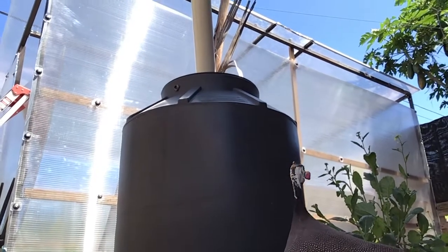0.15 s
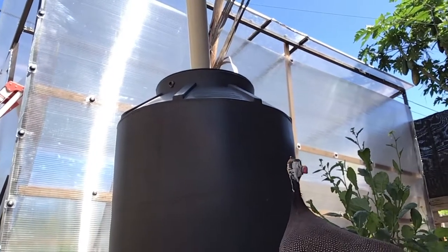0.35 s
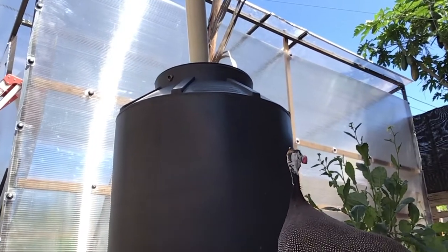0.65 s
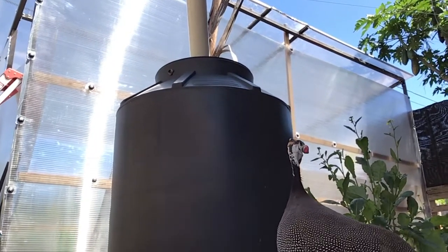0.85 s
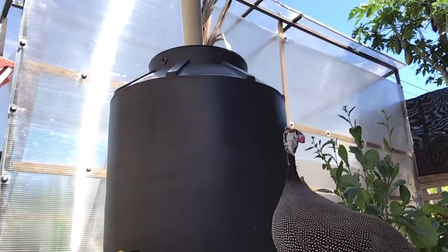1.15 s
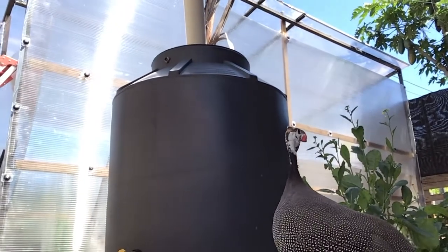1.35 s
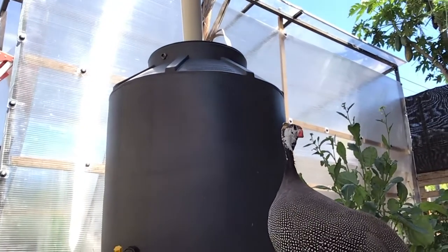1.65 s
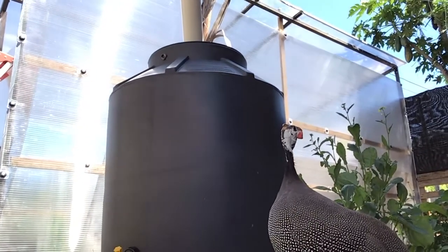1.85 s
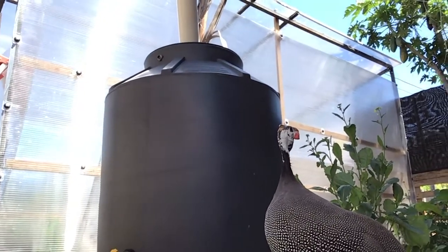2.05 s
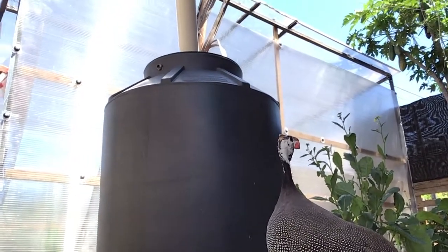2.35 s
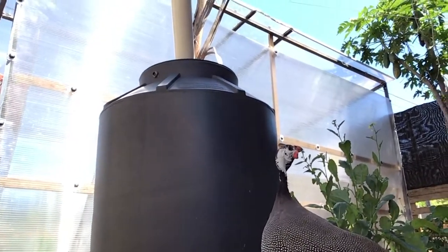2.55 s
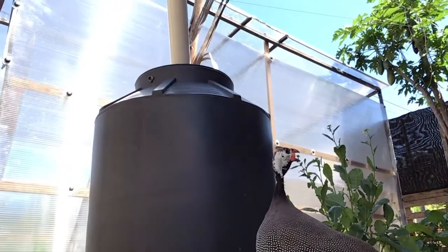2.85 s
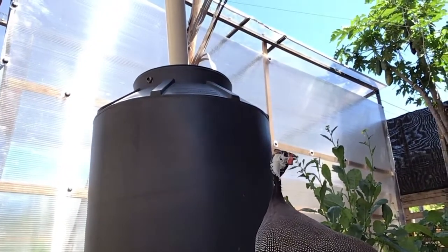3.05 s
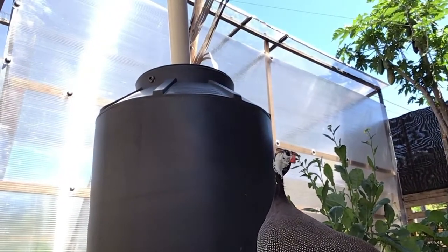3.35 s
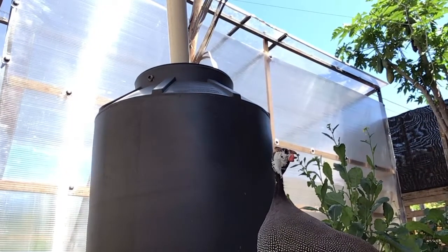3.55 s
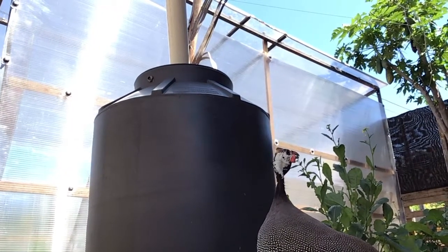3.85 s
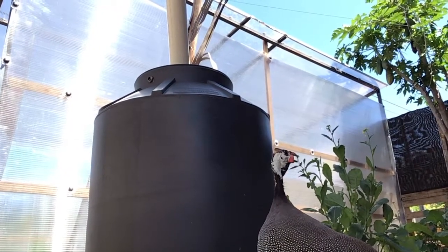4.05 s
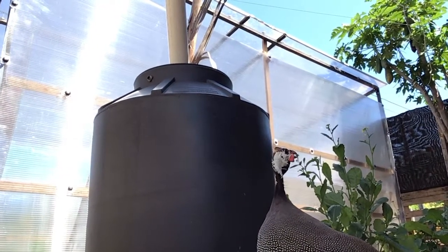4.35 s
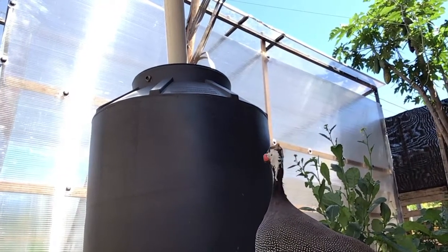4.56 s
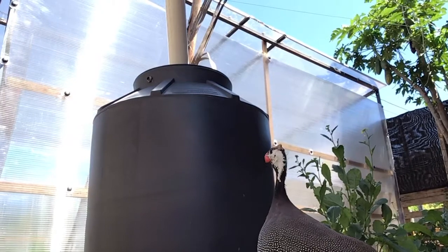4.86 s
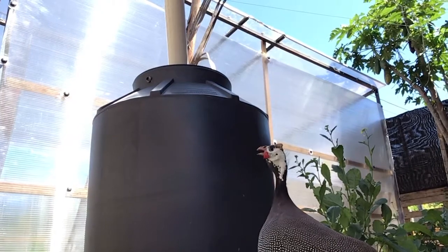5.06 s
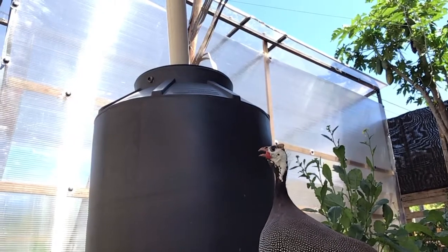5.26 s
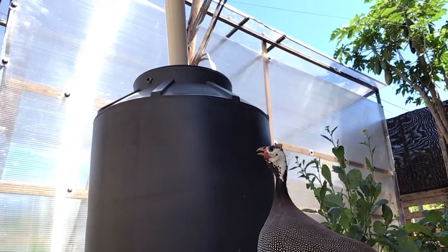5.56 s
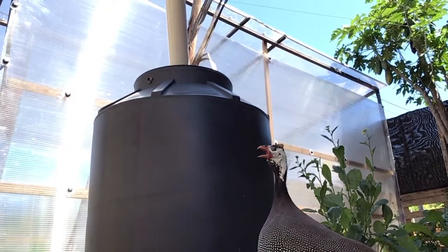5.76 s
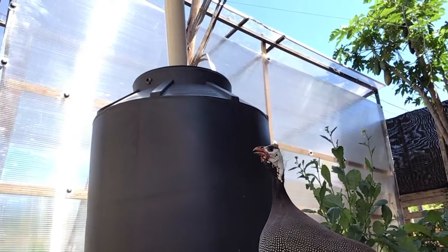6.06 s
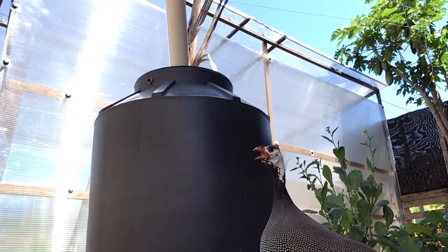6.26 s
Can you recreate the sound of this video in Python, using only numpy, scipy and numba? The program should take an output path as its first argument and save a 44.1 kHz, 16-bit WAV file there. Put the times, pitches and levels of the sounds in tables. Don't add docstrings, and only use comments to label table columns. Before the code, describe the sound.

In an open garden, a near guineafowl repeats a harsh two-part call about every 0.6 seconds. The first short chip comes at 0.24 s and its long syllable at 0.37 s; further pairs start near 0.84, 1.47, 2.1, 2.7, 3.3, 3.85, 4.4, 5.0, 5.55 and 6.12 s. Each chip is a tiny tone near 1.85 kHz; the long note is a sharp whistle around 1.9 kHz cracking into a nasal, rattling buzz, about 0.1 s in all, sometimes edged by tiny squeaks. Between them, distant mates give nasal notes, high chirps, clucks and swelling rasps. A thin small-bird whistle falls at 0.5-0.8 s. Wind rumble and soft microphone knocks mark the first 2.5 s, over a faint motor hum, then calm. Faint twig ticks occur at 0.16, 3.67 and 4.3 s. After 4.6 s the rasp brightens, and the last two chips are loudest. Tank and walls return quick echoes.

```python
import sys
import numpy as np
from scipy import signal
from scipy.fft import rfft, irfft
from scipy.io import wavfile
from scipy.ndimage import uniform_filter1d
from numba import njit

SR = 44100
rng = np.random.default_rng(int(sys.argv[2]) if len(sys.argv) > 2 else 0)


def to_linear_factor(level_db):
    exponent = np.asarray(level_db, float) / 20
    return 10 ** exponent


def transcribe(u):
    v = np.clip(np.atleast_2d(u).T, -1, 1)
    q = np.round(v * 32767).astype(np.int16)
    wavfile.write(sys.argv[1], SR, q)


N = 283122
SILENT_DB = -110

# (frequency [Hz], level [dB per Hz])
WIND_SPECTRUM = [(18, -43.5), (30, -12), (59, 4), (145, -1.5), (360, -26), (455, -35), (500, -46),
                 (1100, -120)]
# (peak time [s], level [dB])
GUSTS = [(0.06, -52.5), (0.6, -49.5), (0.841, -54.5), (1.28, -50), (1.502, -55.5), (2.019, -56.5),
         (2.53, -56), (3.15, -66), (3.279, -71), (3.46, -71), (3.701, -68), (3.849, -63), (4.2, -62.5),
         (4.92, -65), (5.5, -64), (6.06, -61.5)]
CALM_DB, CALMING_DB_PER_S = -62.5, 0.5
GUST_RISE_DB_PER_S, GUST_FALL_DB_PER_S = 100, 128
# (time [s], peak [dB])
THUMPS = [(0.046, -40), (0.556, -32), (0.605, -41.5), (0.788, -37.5), (0.838, -36.5), (1.161, -42.5),
          (1.264, -39.5), (1.329, -39), (1.476, -35), (1.538, -37.5), (2.027, -47), (2.488, -51),
          (2.549, -50), (3.689, -44.5), (3.789, -63)]
THUMP_HZ, THUMP_WIDTH_HZ, THUMP_S, THUMP_LAG_S = 125.4, 74, 0.0047, .009
# (time [s], level [dB])
MOTOR_LEVEL = [(0.0, -61), (.1, -60), (.25, -50), (.45, -67), (2.09, -57), (2.61, -77), (6.42, -74.5)]
# (frequency [Hz], level [dB per Hz])
AIR_SPECTRUM = [(300, 0), (907, -19), (1030, -16), (1260, -11.5), (1970, -6.5), (2210, -15.5), (11900, -29),
                (15500, -41)]
AIR_DB = -66

# (time [s], length [s], pitch [Hz], partial 1 [dB], partial 2 [dB])
MATES = [(0, 0.032, 1087, -64, -51.5), (0.32, 0.018, 1110, -64, -88.5), (0.536, 0.057, 1087, -71, -56),
         (0.865, 0.11, 1038, -72, -76), (1.411, 0.078, 1030, -69, -62), (1.557, 0.15, 1133, -64, -55.5),
         (1.962, 0.072, 1058, -67.5, -72.5), (2.132, 0.09, 1123, -62, -59),
         (2.521, 0.083, 1022, -70.5, -68), (2.722, 0.057, 1135, -65, -60), (3.099, 0.075, 1015, -70, -66),
         (3.255, 0.099, 1115, -74, -55), (3.675, 0.055, 1052, -69, -105), (3.832, 0.17, 1124, -63, -54),
         (4.236, 0.088, 1020, -73, -68.5), (4.375, 0.19, 1109, -61.5, -57),
         (4.787, 0.092, 1014, -71, -67.5), (4.943, 0.092, 1135, -66.5, -62),
         (5.364, 0.066, 1029, -74.5, -62), (5.498, 0.082, 1133, -74, -55), (6.016, 0.15, 1133, -63, -55)]
MATE_BRIGHT_DB = [-8, -7, 5.5, 0, 1, -0.5, -8, 0, -1, 2, 3.5, 1, -3, -1, 3.5, -2, -3, 7, 0.5, -13, -5]
MATE_UPPER_DB = [-22, -15.5, -13.5]
MATE_THIRD_DB = -6
MATE_SCOOP, MATE_SCOOP_S = .03, .025
# (time [s], length [s], start level [dB], brightness [dB])
FADES = [(0, 0.082, -49, -7), (0.503, 0.2, -51.5, -6), (0.831, 0.2, -56, -11.5), (1.981, 0.052, -58, -6),
         (2.526, 0.129, -60, -4), (3.697, 0.097, -60.5, -44), (4.798, 0.1245, -66.5, -18),
         (5.361, 0.12, -66, -40), (5.903, 0.22, -59, -25), (6.121, 0.062, -47, -25.5)]
FADE_DB_PER_S = 129
# (time [s], length [s], end level [dB])
SWELLS = [(0.215, 0.16, -57), (1.427, 0.32, -60), (2.087, 0.26, -50.5), (2.653, 0.19, -47.5),
          (3.247, 0.16, -50), (3.814, 0.15, -52.5), (4.355, 0.16, -52), (4.914, 0.17, -48.5),
          (5.475, 0.18, -50.5), (6.018, 0.028, -40)]
SWELL_RISE_DB, SWELL_BRIGHT_DB = 5.5, -8
# (frequency [Hz], width [Hz], gain [dB])
FAR_MODES = [(1260, 58, -14), (1435, 62, 1), (1450, 227, -2.5), (1900, 300, -14), (2300, 110, -23),
             (2715, 330, -3.5)]
FLOCK_PATCHY_DB = 2.5
# (time [s], peak [dB], pitch [Hz])
FAR_CHIRPS = [(0.21, -63, 3480), (0.808, -60, 3490), (1.4274, -62, 3360), (2.0562, -58.5, 3390),
              (2.666, -61, 3370), (3.272, -54, 3484), (3.822, -49.5, 3470), (4.3804, -51, 3440),
              (4.9526, -53, 3360), (5.533, -50.5, 3398), (6.09, -48, 3410)]
FAR_GLIDE = [0.23, 0.3, .15, .12, .12, .05, 0.0415, 0.035, -0.018, 0.03, 0.041]
# (time [s], peak [dB], pitch [Hz])
FAR_CLUCKS = [(1.5417, -45, 1640), (1.9681, -49.5, 1791), (2.6559, -43.5, 1642), (2.7774, -50, 1814),
              (3.2342, -47.5, 1715), (3.8181, -41.5, 1900), (4.795, -53, 1725), (4.9227, -42.5, 1620),
              (5.4846, -47, 1829), (6.0146, -51, 1733)]
# (time [s], pitch [Hz], level [dB])
FALLING_WHISTLE = [(0.51, 4300, -58), (0.6, 4140, -62.5), (0.69, 3920, -61), (0.76, 3400, -69),
                   (0.81, 3060, -68.5)]
# (time [s], pitch [Hz], level [dB])
LOW_PIPING = [(0.715, 1440, -79), (0.736, 1425, -66), (0.83, 1310, -73.5)]
# (time [s], pitch [Hz], level [dB])
PEEP = [(0.6, 2720, -65), (0.64, 2610, -67), (0.685, 2680, -72.5)]
# (time [s], peak [dB])
TICKS = [
    (0.159, -69),
    (3.667, -63),
    (4.32, -59),
]

# (time [s], peak [dB], pitch [Hz], length [s])
SHORT_CALLS = [(0.244, -36.5, 1886, 0.028), (0.841, -30.5, 1818, 0.021), (1.466, -28, 1828, 0.021),
               (2.0974, -31, 1865, 0.0187), (2.703, -33, 1869, 0.016), (3.302, -28.5, 1862, 0.018),
               (3.8509, -26.5, 1881, 0.018), (4.399, -25.5, 1860, 0.024), (4.985, -27, 1822, 0.023),
               (5.5567, -19.5, 1840, 0.027), (6.12, -17.5, 1844, 0.023)]
# (rasp [dB], mouth resonance [dB], beak pitch [Hz])
SHORT_COLOUR = [(7, 0, 5640), (-0.5, 12, 5830), (-4.5, -2, 3700), (-1, 8.5, 5510), (3, 0, 5550),
                (0.5, 8, 5600), (-1.5, -8, 5500), (-5, -6.5, 5800), (8, 11, 5000), (3.5, 6.5, 5330),
                (1, 15, 5430)]
SHORT_OVERTONE_DB = [8.5, 5, 6.5, 5, 1, 5, 6.5, 11, 5, 3, 8]
SHORT_SAG = [.6, 1.1, 1.1, .6, .4, 1.2, .6, 1.1, 0.27, .6, 0.54]
# (time [lengths], level [dB], pitch above the middle [Hz], rasp [dB])
SHORT_SHAPE = [(-.7, -29, 80, -31.5), (-0.3, -19, 64.5, -19), (.1, -6, 31.5, -13), (0.22, -2, 4, -9.5),
               (.6, -1, -13.5, -6), (.8, -9.5, -17.5, -7.5), (0.97, -33, -18.5, -15)]
SHORT_RASP_DB, SHORT_LOW_DB = -19.5, -27.5
SHORT_RASP_TAIL_S, SHORT_LOOSENESS = .03, .4

# (time [s], whistle length [s], length [s], whistle [dB], buzz [dB])
LONG_CALLS = [(0.373, 0.025, 0.12, -25, -25.5), (0.995, 0.015, 0.087, -16.5, -26.5),
              (1.629, 0.025, 0.079, -17.5, -26), (2.236, 0.02, 0.1, -17, -25.5),
              (2.836, 0.029, 0.1, -17.5, -30.5), (3.425, 0.024, 0.11, -19.5, -27.5),
              (3.964, 0.028, 0.11, -19, -27), (4.524, 0.046, .121, -22.5, -26.5),
              (5.117, 0.015, 0.11, -17, -26.5), (5.698, 0.023, 0.11, -15, -26.5),
              (6.233, 0.026, 0.12, -19, -25.5)]
# (whistle pitch [Hz], whistle gain [dB], broken whistle halfway [dB],
#                  at full buzz [dB], buzz halfway [dB])
LONG_COURSE = [(1899, 1.5, -8.5, 2.5, 5), (1901, -3.5, -7, 3.5, 4.5), (1896, -2.5, -4, 0, -2),
               (1890.5, -3.5, 0, -1, -5), (1882, -2.5, -2.5, .5, -1), (1875, 2, -2.5, -1.5, -2.5),
               (1867, -3.5, 1.5, -1.5, -0.5), (1855, 1.5, -2.5, 2, .5), (1867, 1, -7, 2, 5.5),
               (1857, -2.5, -2.5, .5, 1), (1856, -0.5, -1, 3, 0)]
# (beak pitch at whistle [Hz], at end [Hz], rasp under whistle [dB],
#                  rasp in buzz [dB], mouth resonance [dB])
LONG_COLOUR = [(5490, 4620, 1, 0, 5.5), (5510, 4470, 3, -0.5, 6.5), (6000, 4200, 1.5, -2, 8),
               (5910, 4400, 1, -0.5, 8.5), (5960, 4480, 6.5, 6.5, 3.5), (5490, 4280, 4, 2, 7),
               (6000, 4410, -0.5, 1, 3), (5300, 3860, 4.5, -3, 2), (5390, 3750, 4, 1, 1.5),
               (5133, 3930, 5.5, -0.5, 2.5), (5260, 3900, 4, 1.5, 6)]
# (tuning [Hz], pitch arch [Hz], low voice [dB], buzz fundamental [dB])
LONG_VOICE = [(1900, 27, 0, 1.5), (1900, 52.5, 0, 0), (1900, 54, 1, 0.5), (1900, 58.1, -1.5, -1.5),
              (1900, 55.1, 4, 1.5), (1900, 52.8, 0., 1), (1900, 54.3, -0.5, -2), (1900, 58.2, -1, 2),
              (1900, 54, 1, 1.5), (1900, 49, -1, 0.5), (1900, 35, -4, 0.5)]
# (looseness of broken whistle [0-1], windpipe [dB], overtones [dB])
LONG_MANNER = [(0.87, -0.5, 5), (1, 1, -3), (.9, 3.5, -1), (.9, 1.5, -5), (0.93, 0, 1), (0.99, 3, 0.5),
               (0.93, 3.5, 2.5), (0.79, 0, 2.5), (0.82, -2.5, 5.5), (0.8, 1, 0.5), (0.79, -2, -4)]
LOCK_SHARE = [0.728, 0.658, 0.698, 0.75, 0.777, 0.719, 0.686, 0.678, .43, 0.666, 0.725]
LOCK_SLACK = [.45, 0.6, .6, 0.53, 1.06, 0.67, 0.88, 0.79, 1.1, 1.1, 0.95]
CLOSE_S = [0.073, 0.049, 0.057, 0.072, 0.067, 0.073, 0.059, 0.076, 0.079, 0.071, 0.086]
LEAD_S, SWELL_S, BREAK_S, TAIL_S = .017, 0.00684, 0.0083, 0.021
STAGE_HZ = [1918, 1947.6, 1909, 1913]
STAGE_DRIFT_HZ_PER_S = [-1.5, 6.5, 0, 1.5]
WHISTLE_BEND_HZ = [35, 29.5, -0.5, 9.5]
WHISTLE_DB = [-29, -12.5, 2, 1.5]
BROKEN_DB = [-0.5, -3, -1.5, -28.5]
RASP_DB = [-26, -11.5, -11, -2, -3, 4, 0, -13.5]
LOW_DB = [-30.5, -61.5, -17.5, -6.5, -13.5, -12, -11.5, -25.5]
BUZZ_DB = [-57, -50, -54.5, -36, -33.5, -17.5, -17, -50.5]
CLEAR_SLACK = [0.18, .2, 0.23, 0.39]
ARCH_LOW_DB = 2
WANDER_HZ = 12
ROUNDING_S = 0.0029
OVERTONE_DB = [-42, -31.5, -53, -52, -45]

# (time [s], gain [dB])
FACING = [(0, -10.5), (2.3, -15), (3.5, -14.5), (4.6, -7), (5.1, -6.5), (6.4, -8)]
FRONT_DB, PIPE_LAG = -1.5, 0.44
# (frequency [Hz], width [Hz], gain [dB])
PIPE_MODES = [(1334, 41, 15), (1464, 70, 17.5), (1677, 123, 26.5), (1803, 170, 23), (2321, 86, 11.5),
              (2657, 190, 5), (3487, 81, 7)]
LOCKED_PIPE_DB = -3
# (frequency [Hz], width [Hz], gain [dB])
BEAK_MODES = [(4280, 1260, 2), (4950, 754, 2.5), (5390, 148, 3), (6107, 340, 1)]
BEAK_REACH_HZ, PATCHY_DB = 563, 3
CLOSING_S, BEAK_LEAD_HZ, BEAK_SAG = 0.014, 300, 0.19
# (frequency [Hz], width [Hz], gain [dB])
HEAD_MODES = [(4100, 1800, -28), (7400, 2800, -14), (8230, 370, -4.5), (14300, 2000, -6)]
HEAD_WAKE_DB, PIPE_WAKE_DB = 10, 25
MOUTH_HZ, MOUTH_WIDTH_HZ, MOUTH_FOLLOWS = 11490, 1150, 0.55
PUFF_HZ, PUFF_WIDTH_HZ, PUFF_DB = 1410, 100, 16
RASP_FLOOR_HZ = 1020

# (time [s], length [s], pitch [Hz], level [dB])
SQUEAKS = [(0.226, 0.039, 3940, -71), (0.33, 0.013, 3900, -70), (0.34, 0.034, 4220, -72),
           (0.956, 0.027, 4560, -48.5), (0.974, 0.039, 3950, -46.5), (1.442, 0.031, 3920, -63),
           (1.582, 0.037, 4540, -51.5), (1.6, 0.042, 4014, -45.5), (2.07, 0.038, 3945, -61.5),
           (2.204, 0.048, 3880, -53), (3.942, 0.012, 3955, -57), (4.494, 0.017, 4950, -53),
           (5.088, 0.016, 4400, -49), (5.102, 0.014, 4115, -49), (5.663, 0.025, 4587, -47),
           (5.665, 0.01, 5000, -54), (5.677, 0.015, 4137, -48), (6.2, 0.023, 4594, -57),
           (6.212, 0.021, 3970, -54)]
SQUEAK_SECOND_DB, SQUEAK_THIRD_DB = -16.5, 1
SWEET_HZ, SWEET_WIDTH_HZ = 12310, 330

# (delay [s], level [dB])
ECHOES = [
    (.012, -13.5),
    (.037, -18),
    (.062, -31.5),
    (0.11, -75.5),
]
# (time [s], echo gain [dB])
WALLWARD = [(0, 1.5), (4.6, .5), (5.1, -2), (6.0, -2), (6.42, -2.5)]
YARD_T60_S, YARD_DB, WALL_CUT_HZ = 0.28, -22.5, 10000
MIC_TOP_HZ = 15800


def rms_one(x):
    return x / np.sqrt(np.mean(x ** 2) + 1e-20)


def joined(tables, levels, fade_s=.009):
    rows = []
    for table in tables:
        table = np.array(table, float)
        ends = table[[0, -1]].copy()
        ends[:, 0] += [-fade_s, fade_s]
        ends[:, levels] = SILENT_DB
        rows += [ends[0], *table, ends[1]]
    s, *columns = np.transpose(rows)
    return [np.interp(np.arange(N) / SR, s, c) for c in columns]


def slow(hz):
    r = np.exp(-2 * np.pi * hz / SR)
    noise = rng.standard_normal(N + 9000)
    return rms_one(signal.lfilter([1], [1, -2 * r, r * r], noise)[9000:])


def turns(hz):
    return 2 * np.pi * np.cumsum(hz) / SR


def band(x, low_hz, high_hz):
    return signal.sosfilt(signal.butter(2, [low_hz, high_hz], "band", fs=SR, output="sos"), x)


def coloured(points):
    hz, db = np.transpose(points)
    gain = to_linear_factor(np.interp(np.log(np.fft.rfftfreq(N, 1 / SR) + 1), np.log(hz), db))
    return rms_one(irfft(rfft(rng.standard_normal(N)) * gain, N))


def resonate(x, modes):
    out = 0
    for k, (hz, width_hz, db) in enumerate(modes):
        r = np.exp(-np.pi * width_hz / SR)
        top = [(1 - r * r) / 2, 0, (r * r - 1) / 2]
        bottom = [1, -2 * r * np.cos(2 * np.pi * hz / SR), r * r]
        out = out + (-1) ** k * to_linear_factor(db) * signal.lfilter(top, bottom, x)
    return out


@njit
def moving(x, hz, r, rate):
    y = np.zeros(len(x))
    for i in range(2, len(x)):
        push = (1 - r * r) / 2 * (x[i] - x[i - 2])
        y[i] = push + 2 * r * np.cos(2 * np.pi * hz[i] / rate) * y[i - 1] - r * r * y[i - 2]
    return y


def wind_db():
    t = np.arange(N) / SR
    power = to_linear_factor(CALM_DB - CALMING_DB_PER_S * t)
    for s, db in GUSTS:
        power = power + to_linear_factor(db - np.maximum(GUST_RISE_DB_PER_S * (s - t), GUST_FALL_DB_PER_S * (t - s)))
    return 20 * np.log10(power)


def thumps():
    push = np.zeros(N)
    bump = np.hanning(int(THUMP_S * SR))
    for s, db in THUMPS:
        at = int((s + THUMP_LAG_S) * SR)
        push[at:at + len(bump)] = to_linear_factor(db) * bump
    return resonate(push, [(THUMP_HZ, THUMP_WIDTH_HZ, 7)])


def background():
    wind = to_linear_factor(wind_db() + 4.1 * slow(28)) * coloured(WIND_SPECTRUM)
    motor = to_linear_factor(joined([MOTOR_LEVEL], [])[0] + 2.0 * slow(0.68)) * np.sin(turns(np.full(N, 172.)))
    air = to_linear_factor(AIR_DB + 0.4 * slow(12)) * coloured(AIR_SPECTRUM)
    return wind + thumps() + motor + air


def mates():
    out = np.zeros(N)
    waver = 1 + 0.005 * slow(60)
    flutter = [to_linear_factor(5.0 * slow(27)) for k in range(3)]
    for (s, length_s, hz, first_db, second_db), bright_db in zip(MATES, MATE_BRIGHT_DB):
        u = np.linspace(0, 1, int((length_s + 0.016) * SR))
        span = slice(int(s * SR), int(s * SR) + len(u))
        one, two, three = [f[span] for f in flutter]
        scoop = MATE_SCOOP * np.exp(-u * length_s / MATE_SCOOP_S)
        phase = turns(hz * (1 + 0.31 * length_s * (u - .5) - scoop) * waver[span])
        weak = sum(to_linear_factor(db) * np.sin((k + 4) * phase) for k, db in enumerate(MATE_UPPER_DB))
        upper = np.sin(3 * phase) + 2 * u * one * weak
        third_db = (first_db + second_db) / 2 + MATE_THIRD_DB + bright_db
        note = to_linear_factor(first_db) * one * np.sin(phase) + to_linear_factor(second_db) * two * np.sin(2 * phase)
        note += to_linear_factor(third_db) * three * upper
        out[span] += to_linear_factor(4.5) * np.minimum(1, 9 * u) * np.minimum(1, 4 * (1 - u)) * note
    return out


def beating(high_turn, low_turn, low_share, breath_db):
    flow = np.exp(4.0 * np.cos(high_turn) + 4.5 * low_share * np.cos(low_turn))
    push = np.diff(flow, prepend=1)
    out = push / np.sqrt(uniform_filter1d(push ** 2, size=500))
    out = out + to_linear_factor(breath_db) * rng.standard_normal(N)
    for lag in (23, 37, 59):
        loop = np.r_[1, np.zeros(lag - 1), -.55]
        out = signal.lfilter(loop[::-1], loop, out)
    return out


def patchy(x, modes):
    return rms_one(sum(to_linear_factor(FLOCK_PATCHY_DB * slow(14)) * resonate(x, [mode]) for mode in modes))


def flock_rasps():
    swells = [[(s, db - SWELL_RISE_DB, SWELL_BRIGHT_DB), (s + length_s, db, SWELL_BRIGHT_DB)]
              for s, length_s, db in SWELLS]
    fades = [[(s, db, top_db), (s + length_s, db - FADE_DB_PER_S * length_s, top_db)]
             for s, length_s, db, top_db in FADES]
    db, top_db = joined(sorted(swells + fades), [1], fade_s=.012)
    high_turn = turns(1850 + 40 * slow(12)) + slow(90)
    low_turn = turns(1120 + 30 * slow(12)) + .6 * slow(60)
    source = beating(high_turn, low_turn, low_share=.8, breath_db=-17)
    top = patchy(source, [(3150, 190, -3.5), (3880, 85, -1.5), (4880, 200, -4), (5650, 350, -2),
                          (7100, 2100, -11.5), (11700, 2600, -12.5)])
    body = rms_one(band(patchy(source, FAR_MODES), low_hz=945, high_hz=5000))
    hollow = to_linear_factor(np.minimum(-24.5 - 1.65 * top_db, 3)) * rms_one(resonate(source, [(1487, 64, 0)]))
    swell = uniform_filter1d(uniform_filter1d(to_linear_factor(db), size=900), size=900)
    return swell * to_linear_factor(0.52 * slow(29)) * (body + hollow + to_linear_factor(top_db + 1.0 * slow(20)) * top)


def chirps(events, length_s, glide, upper_db):
    out, u = np.zeros(N), np.linspace(0, 1, int(length_s * SR))
    for (s, db, hz), rise in zip(events, np.resize(glide, len(events))):
        at = int((s - .2 * length_s) * SR)
        phase = turns(hz * (1 + rise * (u - .5)))
        tone = np.sin(phase) + to_linear_factor(upper_db) * (np.sin(3 * phase / 2) + .5 * np.sin(2 * phase))
        out[at:at + len(u)] += to_linear_factor(db) * np.sin(np.pi * u) ** 2 * tone
    return out


def whistle_bird(rows, waver_rad):
    hz, db = joined([rows], [2])
    return np.sqrt(2) * to_linear_factor(db - 2 + 4 * slow(40)) * np.sin(turns(hz) + waver_rad * slow(110))


def flock():
    notes = mates() + flock_rasps()
    notes += chirps(FAR_CHIRPS, length_s=0.051, glide=FAR_GLIDE, upper_db=-9.0)
    notes += chirps(FAR_CLUCKS, length_s=0.081, glide=-0.043, upper_db=-48.5)
    return notes + whistle_bird(FALLING_WHISTLE, .9) + whistle_bird(LOW_PIPING, .3) + whistle_bird(PEEP, .4)


def ticks():
    clicks = np.zeros(N)
    decay = np.exp(-np.arange(40) / 14)
    for s, db in TICKS:
        clicks[int(s * SR):int(s * SR) + 40] = to_linear_factor(db + 15.0) * rng.standard_normal(40) * decay
    return band(clicks, low_hz=5560, high_hz=12300)


def short_rows():
    calls = []
    t, d, sag_hz, late_db = np.transpose(SHORT_SHAPE)
    for call, colour, ring_db, share in zip(SHORT_CALLS, SHORT_COLOUR, SHORT_OVERTONE_DB, SHORT_SAG):
        s, db, hz, length_s = call
        rasp_db, mouth_db, beak_hz = colour
        rasp = db + SHORT_RASP_DB + rasp_db + late_db
        held = np.outer([mouth_db, SHORT_LOOSENESS, 0, ring_db], np.ones(len(t)))
        rows = np.transpose([s + t * length_s, hz + share * sag_hz, db + d, db + d - 52.5,
                             db + SHORT_LOW_DB + d, rasp, *held]).tolist()
        tail = np.add(rows[-1], [SHORT_RASP_TAIL_S, 0, -30, -30, -30, -12.5, 0, 0, 0, 0])
        calls.append(rows + [tail.tolist()])
    return calls


def long_rows():
    calls = []
    for call, lock, colour, voice, manner, course, tight in zip(
            LONG_CALLS, LOCK_SHARE, LONG_COLOUR, LONG_VOICE, LONG_MANNER, LONG_COURSE, LOCK_SLACK):
        s, whistle_s, length_s, db, buzz_db = call
        whistle_hz, gain_db, half_db, full_db, half_buzz_db = course
        open_hz, shut_hz, early_db, late_db, mouth_db = colour
        tuning_hz, arch_hz, low_db, root_db = voice
        rasp_s = whistle_s + BREAK_S
        lock_s = rasp_s + lock * (length_s - rasp_s)
        times = [-LEAD_S, -SWELL_S, 0, whistle_s, rasp_s, lock_s, length_s, length_s + TAIL_S]
        late_hz = (STAGE_HZ + np.multiply(STAGE_DRIFT_HZ_PER_S, s)) * tuning_hz / 1900
        hz = np.r_[np.add(whistle_hz, WHISTLE_BEND_HZ), late_hz]
        whistle_db = np.r_[np.add(db, WHISTLE_DB), np.add(buzz_db, BROKEN_DB)]
        whistle_db = whistle_db + [0, 0, 0, gain_db, 0, full_db, full_db, 0]
        facing_db = np.interp(s, *np.transpose(FACING))
        rasp_db = np.add(RASP_DB, facing_db) + np.repeat([early_db, late_db], [5, 3])
        voices = buzz_db + np.array([np.add(BUZZ_DB, root_db), np.add(LOW_DB, low_db), rasp_db])
        held = np.outer([mouth_db, *manner], np.ones(len(times)))
        rows = np.transpose([np.add(s, times), hz, whistle_db, *voices, *held])
        rows[:, 7] *= [*CLEAR_SLACK, 1.1, tight, tight, tight]
        arch = (rows[4] + rows[5]) / 2
        arch = arch + [0, arch_hz, half_db, half_buzz_db, ARCH_LOW_DB, 0, 0, 0, 0, 0]
        arch[7] = rows[4, 7]
        calls.append([*rows[:5].tolist(), arch.tolist(), *rows[5:].tolist()])
    return calls


def beak_rows():
    rows = []
    for (s, db, tone_hz, length_s), (rasp_db, mouth_db, hz) in zip(SHORT_CALLS, SHORT_COLOUR):
        rows.append([(s - length_s, hz), (s + 2 * length_s, hz)])
    for (s, whistle_s, length_s, *levels), (high, low, *rest), close in zip(LONG_CALLS, LONG_COLOUR, CLOSE_S):
        rows.append([(s - LEAD_S, high + BEAK_LEAD_HZ), (s + LEAD_S, high),
                     (s + close - CLOSING_S, high + BEAK_SAG * (low - high)),
                     (s + close + CLOSING_S, low), (s + length_s + TAIL_S, low)])
    return sorted(rows)


def throat(source, rough, locked, slack, low_db, pipe_db, mouth_db):
    centre_hz = joined(beak_rows(), [])[0] * (1 + .03 * slow(40))
    beak = 0
    for mode in BEAK_MODES:
        reach = 1 / (1 + ((centre_hz - mode[0]) / BEAK_REACH_HZ) ** 2) ** 2
        beak = beak + to_linear_factor(PATCHY_DB * slow(30)) * resonate(resonate(source, [mode]), [mode]) * reach
    open_db = np.clip(.7 * (low_db + 45), -20, 0)
    tight = np.minimum(slack - .4, 0)
    head = to_linear_factor(open_db + HEAD_WAKE_DB * tight + 2.8 * slow(29)) * resonate(source, HEAD_MODES)
    turned_db = PIPE_LAG * (joined([FACING], [])[0] - FRONT_DB)
    windpipe_db = open_db - turned_db + LOCKED_PIPE_DB * locked + pipe_db + PIPE_WAKE_DB * tight
    rasp = to_linear_factor(windpipe_db) * resonate(source, PIPE_MODES) + head + to_linear_factor(9.0) * beak
    puff = resonate(band(source, low_hz=1110, high_hz=1700), [(PUFF_HZ, PUFF_WIDTH_HZ, PUFF_DB)])
    rasp += (1 - rough) * puff
    mouth_hz = MOUTH_HZ + MOUTH_FOLLOWS * (centre_hz - 5250)
    r = np.exp(-np.pi * MOUTH_WIDTH_HZ / SR)
    mouth = moving(moving(source, mouth_hz, r, SR), mouth_hz, r, SR)
    rasp += to_linear_factor(mouth_db + 1.0 * slow(30)) * mouth
    rasp = signal.sosfilt(signal.butter(6, RASP_FLOOR_HZ, "high", fs=SR, output="sos"), rasp)
    return rasp / np.sqrt(uniform_filter1d(band(rasp, low_hz=3500, high_hz=7000) ** 2, size=900))


def guineafowl():
    columns = joined(sorted(long_rows() + short_rows()), [2, 3, 4, 5])
    hz, whistle_db, buzz_db, low_db, rasp_db, mouth_db, slack, pipe_db, ring_db = columns
    locked = np.clip((buzz_db - low_db + 25.0) / 12, 0, .85)
    rough = np.clip((rasp_db - whistle_db + 20.5) / 12, .03, 1)
    loose = np.clip(slack, 0, 1.3) * rough * (1 - 0.54 * locked)
    cycle = turns((hz + WANDER_HZ * loose * slow(25)) / 5)
    high_turn = 5 * cycle + .9 * loose * slow(150)
    drift = (.4 + 1.3 * rough) * slow(40) + (.3 + .3 * rough) * slow(250)
    low_turn = 3 * cycle + (1 - locked) * drift
    whistle = (1 + 1.22 * loose * slow(110)) * np.sin(high_turn) / np.sqrt(1 + 1.8 * loose ** 2)
    for k, db in enumerate(OVERTONE_DB):
        whistle += to_linear_factor(db + ring_db + 4.6 * slow(60)) * np.sin((k + 2) * high_turn)
    low = (1 + 0.95 * loose * slow(46)) * np.sin(low_turn)
    buzz = np.sin(cycle) + to_linear_factor(-4.5) * np.sin(2 * cycle + 1) + to_linear_factor(2.0) * np.sin(2 * low_turn)
    low_share = np.clip(.42 + .6 * rough + locked, 0, 1)
    source = beating(high_turn, low_turn, low_share, breath_db=-12 + 7 * loose)
    rasp = throat(source, rough, locked, slack, low_db, pipe_db, mouth_db)
    whistle_gain = uniform_filter1d(to_linear_factor(whistle_db), size=int(ROUNDING_S * SR))
    tones = whistle_gain * whistle + to_linear_factor(low_db) * low + to_linear_factor(buzz_db) * buzz
    return np.sqrt(2) * tones + to_linear_factor(rasp_db) * rasp


def squeaks():
    out, waver = np.zeros(N), 0.25 * slow(120)
    for s, length_s, hz, db in SQUEAKS:
        u = np.linspace(0, 1, int(length_s * SR))
        span = slice(int(s * SR), int(s * SR) + len(u))
        phase = turns(hz * (1 + 0.014 * (u - .5))) + waver[span]
        third = to_linear_factor(SQUEAK_THIRD_DB) / (1 + ((3 * hz - SWEET_HZ) / SWEET_WIDTH_HZ) ** 2)
        tone = np.sin(phase) + to_linear_factor(SQUEAK_SECOND_DB) * np.sin(2 * phase) + third * np.sin(3 * phase)
        out[span] += np.sqrt(2) * to_linear_factor(db) * np.sin(np.pi * u) * tone
    return out


def yard(x):
    t = np.arange(int(.8 * SR)) / SR
    response = to_linear_factor(YARD_DB - 22.5 - 60 * t / YARD_T60_S) * rng.standard_normal(len(t)) * (t > .008)
    for s, db in ECHOES:
        response[int(s * SR)] += to_linear_factor(db)
    response = signal.lfilter(*signal.butter(1, [500, WALL_CUT_HZ], "band", fs=SR), response)
    return signal.fftconvolve(x, response)[:N]


def scene():
    birds = flock() + ticks() + guineafowl() + squeaks()
    echoes = yard(to_linear_factor(joined([WALLWARD], [])[0]) * birds)
    return (background() + birds + echoes)[None]


def roll_off(x):
    return signal.sosfilt(signal.butter(12, 15700, fs=SR, output="sos"), x)


def record(dry):
    dry = signal.sosfilt(signal.cheby2(10, 50, MIC_TOP_HZ, fs=SR, output="sos"), dry)
    mix = signal.sosfilt(signal.butter(3, 45, "high", fs=SR, output="sos"), dry)
    return roll_off(mix)


dry = scene()
out = record(dry)
transcribe(out)
```